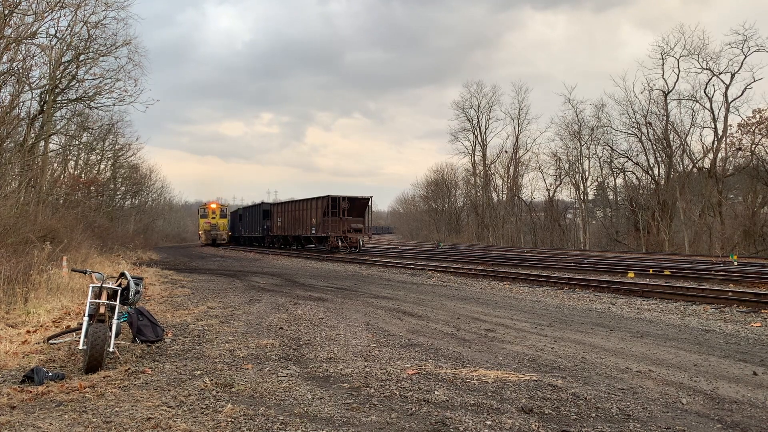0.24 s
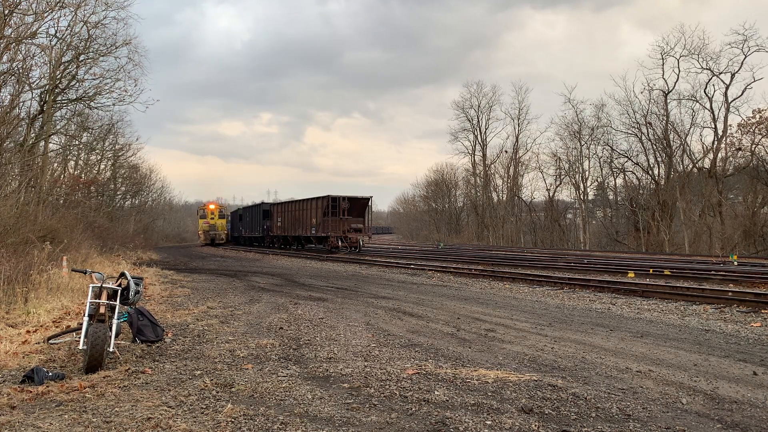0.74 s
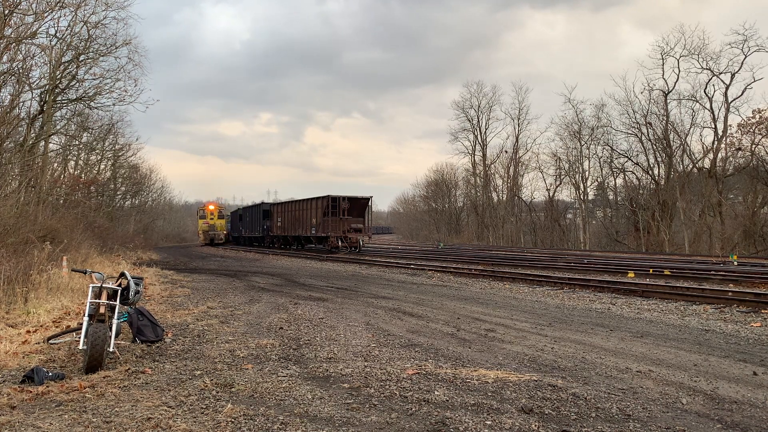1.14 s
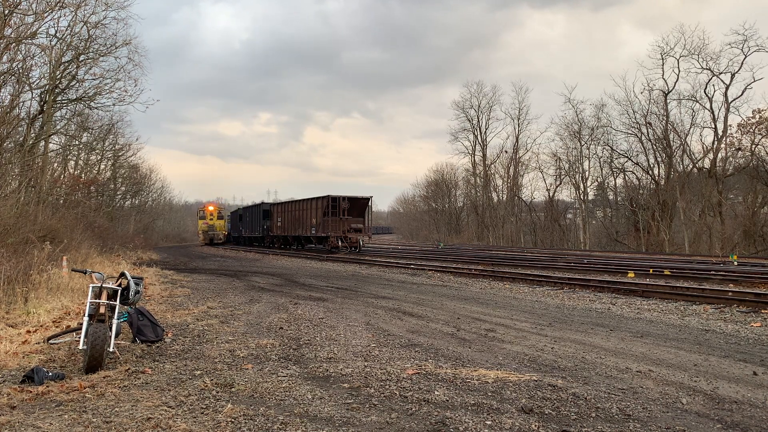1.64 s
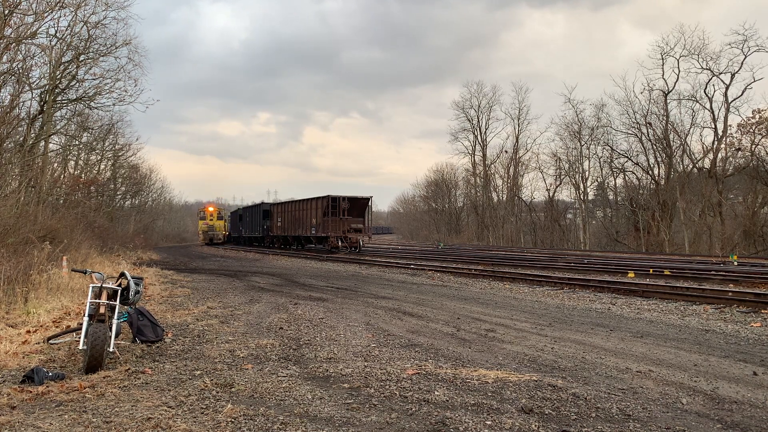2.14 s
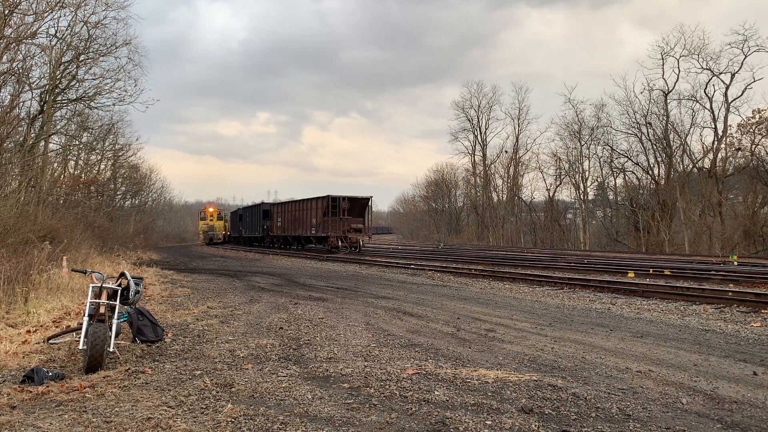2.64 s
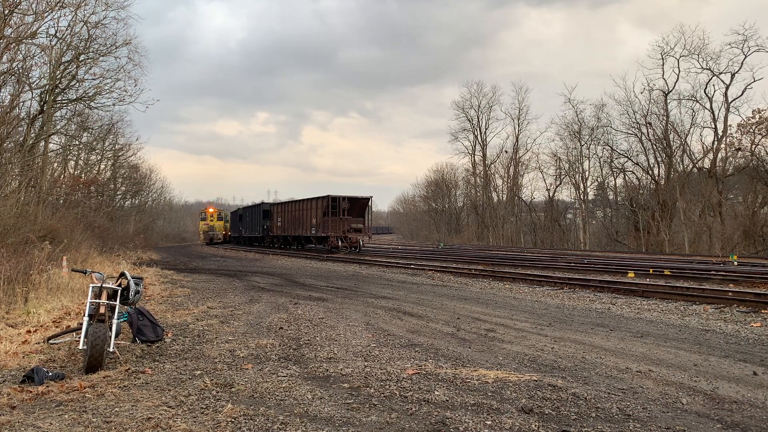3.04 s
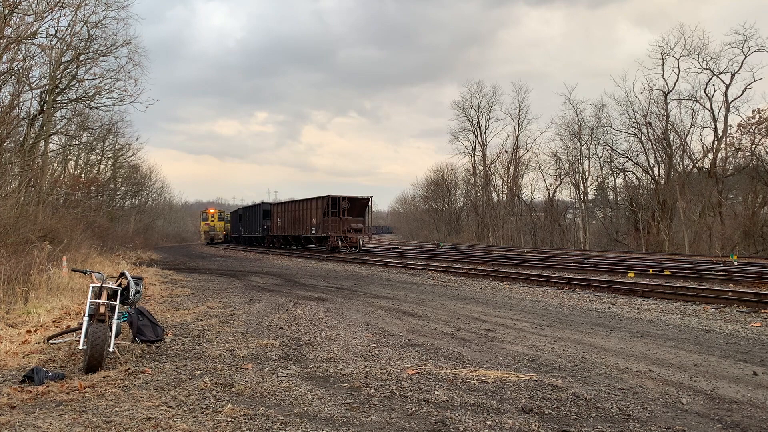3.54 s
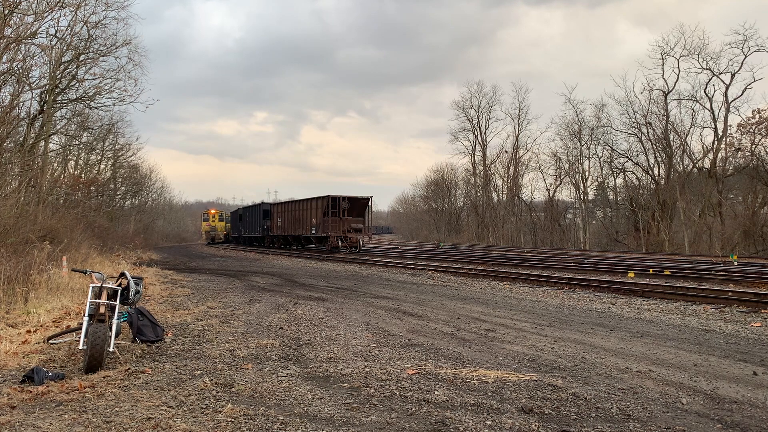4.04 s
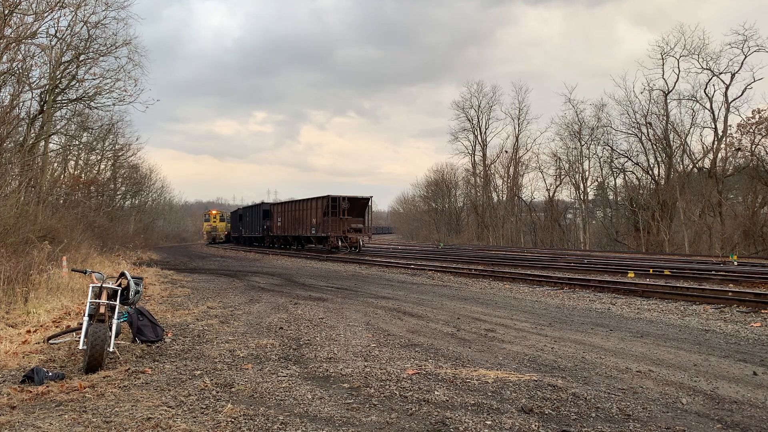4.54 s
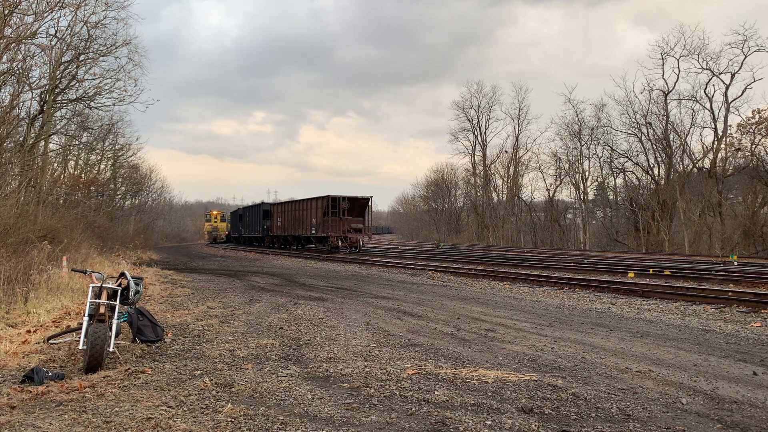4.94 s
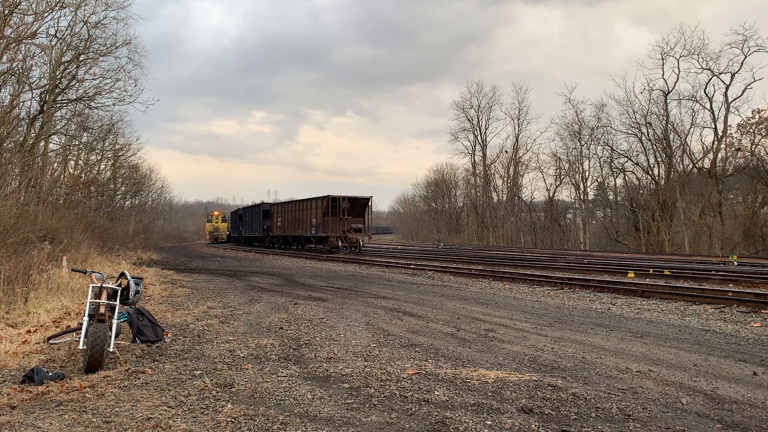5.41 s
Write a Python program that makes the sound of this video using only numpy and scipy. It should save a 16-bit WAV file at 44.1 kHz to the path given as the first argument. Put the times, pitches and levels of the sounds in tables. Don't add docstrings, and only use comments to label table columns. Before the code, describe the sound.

A handheld stereo phone over gravel picks up a low diesel rumble from a train moving away, mostly from the left. A short steel jolt comes early, then irregular dull thumps and hollow car-body drones continue over soft wheel hiss. Sparse dry crackles sound close by, with a sharper grit crunch around the middle. Broad yard hum surrounds everything and the engine slowly weakens.

```python
import sys
import numpy as np
from scipy import signal
from scipy.fft import rfft, irfft
from scipy.io import wavfile
from scipy.ndimage import uniform_filter1d

SR = 44100
rng = np.random.default_rng(int(sys.argv[2]) if len(sys.argv) > 2 else 0)


def ratio_of_db(decibels):
    return 10 ** (np.asarray(decibels, float) / 20)


def transcribe(u):
    v = np.clip(np.atleast_2d(u).T, -1, 1)
    q = np.round(v * 32767).astype(np.int16)
    wavfile.write(sys.argv[1], SR, q)


N = 250047

# pitch_hz, density_db (per Hz)
YARD_COLOUR = [(25, -11), (54, 7), (118, -12), (187, -14.5), (250, -7), (440, -6.5), (650, -8),
               (950, -10.5), (2000, -18), (3050, -26), (4500, -29.5), (6800, -36.5), (8200, -47),
               (15500, -77)]
# pitch_hz, density_db (per Hz)
ROAR_COLOUR = [(300, -24), (430, -4.5), (540, -9.5), (800, -12), (1100, -9.5), (1700, -16), (3050, -22.5),
               (4500, -31), (6000, -37), (7200, -39), (8700, -39), (11000, -44), (13500, -41.5),
               (14900, -43), (15600, -54)]
# pitch_hz, width_hz, added_share (negative thins the
FAN_TONES = [(894, 33, .45), (999, 16, 0.82), (1031, 20, 0.21), (1520, 120, -0.23), (3550, 450, -.35),
             (4750, 760, 0.37), (2950, 450, .15), (1309, 53, 0.7), (1380, 36, 0.22), (1710, 71, 0.67),
             (2270, 390, 0.37), (6700, 38, 0.66)]
# pitch_hz, width_hz, level_db
FRAME_MODES = [(43.7, 6.3, -23), (48.1, 16, 2), (59, 18, 0.5), (78, 28.2, 4.5)]
# pitch_hz, width_hz, level_db
EXHAUST_MODES = [(105.2, 20.3, -2.5), (119.7, 15, -0.5), (142.2, 26.3, 0), (165.5, 20, -5.5),
                 (176.3, 14.1, -1.5), (193.7, 18.7, -5)]
# pitch_hz, width_hz, level_db
BODY_MODES = [(225, 43.4, 2.5), (269.5, 20.4, 0.5), (282.2, 27.3, 0.5), (341.5, 53, -1.5),
              (407.6, 87, -2.5)]
# pitch_hz, resting_db, waver_hz
GEAR_WHINES = [
    (436.8, -52, 1.0),
    (649.5, -57, 1.6),
]
# time_s, rise_db, length_s
TRAIN_SINGS = [(.3, 10, 0.12), (.6, 6, 0.059), (1.199, 4.9, 0.17), (1.6, 13, 0.11), (1.73, 12, .12),
               (2.2, 7, 0.16), (3.6, 9, 0.14), (3.77, 10, 0.08), (4.7, 6, .12), (5.5, 3, .15)]
# time_s, rise_db, length_s
FAR_GEAR_SINGS = [(1.1, 7, .3), (1.42, 5, .15), (2.4, 7, .4), (2.8, 6, .12), (3.12, 13, .12), (3.25, 2, .1),
                  (3.36, 12, .17), (3.8, 6, .28)]
# time_s, level_db
TRAIN_DISTANCE = [(0, -22.5), (.4, -22.5), (.8, -21.5), (2.0, -24), (3.0, -24.5), (4.2, -26), (5.3, -28.5),
                  (5.67, -25.5)]
# time_s, strength_db (negative dips), pitch_hz, length_s
SURGES = [(.01, 14.5, 56, 0.037), (0.158, 6.5, 135, 0.017), (0.276, 6, 58.3, 0.04),
          (0.326, -7, 167, 0.028), (0.43, 5, 135, 0.029), (0.477, 4.5, 57, 0.26), (0.61, 5, 58, 0.042),
          (0.794, -7, 102, 0.093), (0.889, 11.5, 112, 0.026), (0.923, 13, 202, 0.022),
          (1.16, 8.5, 157, 0.062), (1.444, -8.5, 136, 0.05), (1.564, 2, 138, 0.11), (1.65, 4, 134, 0.064),
          (1.735, 5, 59.5, 0.044), (2.099, -11, 137, 0.03), (2.443, 23, 157, 0.031),
          (2.712, 9, 134, 0.029), (2.763, 7, 109, 0.014), (3.048, 4, 58, 0.045), (3.107, -10, 135, 0.028),
          (3.373, 3, 111, 0.18), (3.743, 4, 58, 0.11), (3.867, 6.5, 135, 0.066), (4.214, 0.5, 182, 0.14),
          (4.715, 5.5, 110, 0.13), (4.83, -10, 135, 0.034), (5.09, 7, 177, 0.041),
          (5.256, 16.5, 292, 0.032), (5.317, 7.5, 134, 0.11), (0.324, -2, 49, 0.049),
          (0.947, -15, 49, .05), (1.15, -12, 49, 0.086), (1.317, -8, 49, 0.12), (1.9, 8, 49, .15),
          (2.35, -11, 49, .05), (2.455, 6, 49, .04), (2.53, -10, 49, 0.062), (2.947, 6, 49, 0.076),
          (5.097, -10, 49, .07), (5.404, 9, 49, .07), (1.106, 2.5, 123, 0.045), (2.607, 7.5, 123, 0.041),
          (2.954, -8, 123, 0.029), (3.93, -7, 160, .1), (5.365, 0.5, 123, 0.054), (5.58, -2, 120.3, 0.2),
          (4.9, -3, 200, 0.15), (5.04, -6, 260, 0.061)]
# time_s, rise_db (negative dips), length_s
CAR_ROCKING = [(.32, 7.5, 0.19), (.55, 4.5, 0.11), (1.0, 1, 0.34), (1.6, 4.5, 0.15), (1.9, 3, 0.35),
               (2.5, 7, 0.24), (2.82, 1.5, 0.27), (3.2, 3.5, 0.134), (3.68, 5, 0.14), (4.25, 6, 0.16),
               (4.65, 6, 0.22), (5.2, 4.5, 0.32), (.78, -1.5, .1), (1.35, -1.5, 0.11), (3.45, -1.5, 0.087),
               (4.45, -3, 0.07), (4.95, -0.5, 0.14)]
# time_s, peak_db, pitch_hz, length_s
JOINT_BOOMS = [(0.041, -22, 108, 0.1), (0.255, -30, 48, 0.089), (0.309, -24.5, 323, 0.023),
               (0.315, -32.5, 248, 0.08), (0.319, -18, 110, 0.018), (0.34, -22, 167, 0.035),
               (0.498, -22, 57, 0.041), (0.609, -27, 67, 0.027), (0.882, -18.5, 72, 0.035),
               (0.886, -23, 134, 0.033), (0.937, -24, 100, 0.036), (0.962, -32.5, 273, 0.046),
               (1.122, -22, 106, 0.042), (1.155, -27.5, 182, 0.047), (1.183, -19, 142, 0.042),
               (1.302, -23, 103, 0.03), (1.572, -18.5, 129, 0.052), (1.634, -25, 125, 0.03),
               (2.281, -24.5, 148, 0.094), (2.389, -24.5, 94, 0.082), (2.443, -32, 246, 0.035),
               (2.452, -21, 113.5, 0.056), (2.522, -28, 176, 0.02), (2.652, -22, 96, 0.022),
               (2.763, -18, 103, 0.021), (3.063, -31.5, 253, 0.046), (3.115, -21.5, 109, 0.055),
               (3.278, -26, 90, 0.07), (3.332, -29.5, 147.3, 0.15), (3.385, -22, 78, 0.022),
               (3.599, -33, 175, 0.091), (3.622, -30, 146, 0.088), (3.752, -27, 62, 0.031),
               (3.889, -25, 143.7, 0.11), (4.194, -24.5, 199, 0.043), (4.376, -27.5, 89, 0.12),
               (4.603, -27.5, 146.6, 0.081), (4.641, -36, 230, 0.073), (4.736, -27, 58.6, 0.043),
               (4.749, -24, 112.5, 0.083), (4.932, -26.5, 54, 0.074), (5.062, -27.5, 184, 0.047),
               (5.129, -26.5, 180, 0.028), (5.146, -22.5, 143, 0.023), (5.236, -26, 205, 0.017),
               (5.245, -30.5, 255.6, 0.058), (5.332, -21, 115.5, 0.078), (5.462, -26, 128, 0.05),
               (0.014, -30.5, 264, .045), (0.073, -33, 270, 0.048), (0.115, -36, 257, .04),
               (.322, -38.5, 536, 0.044), (0.338, -35, 407, .045), (0.399, -32, 310, .04),
               (.424, -44, 522, .04), (0.466, -37, 320, 0.051), (0.579, -32, 246, .045),
               (0.98, -43, 370, .045), (1.179, -34, 258, .045), (1.47, -34, 266, .045),
               (1.527, -37, 407, .045), (1.817, -51, 484, 0.036), (2.022, -39, 414, 0.053),
               (2.43, -38.5, 350, .045), (2.485, -36, 398, 0.042), (2.586, -37, 264, 0.039),
               (3.12, -40.5, 330, 0.055), (3.178, -40, 381, 0.053), (3.339, -37, 313, .04),
               (3.646, -38, 367, 0.065), (3.768, -42.5, 350, 0.045), (4.167, -35.5, 345, .07),
               (4.3, -42, 335, 0.06), (4.601, -42, 390, 0.042), (4.743, -37.5, 362, .05),
               (5.141, -42.5, 417, .05), (5.466, -49, 800, .09)]
# time_s, level_db
COUPLER_RATTLE = [(.2, -71), (.252, -44.5), (.275, -45), (.31, -38.5), (.345, -44), (.42, -48), (.55, -52),
                  (.75, -54), (.9, -99)]
# time_s, rise_db, length_s
COUPLER_PUFF = [
    (.255, 20, .016),
    (.315, 19, .07),
    (.42, 6, .14),
]
# time_s, peak_db, centre_hz, body_db (below 5 kHz)
LEAF_TICKS = [(0.2567, -54, 10500, -9), (1.2421, -49, 6600, -22), (1.7784, -51, 14400, 6),
              (2.805, -55.5, 10500, -18), (3.2081, -56, 10000, -6), (3.2484, -53, 7500, -8),
              (3.5069, -58, 11000, -21), (3.708, -53.5, 10800, -9), (4.0264, -52, 6100, -8),
              (4.168, -52, 9600, -9), (4.2652, -49, 5500, -6), (4.9674, -54.5, 12000, -6),
              (5.159, -62, 11000, -4)]
# time_s, peak_db, centre_hz, width_hz, ahead_db (part from straight ahead)
TWIG_SNAPS = [(.4197, -48, 14200, 3000, -8), (.5561, -70, 4200, 1700, 26), (.5559, -50, 6400, 1800, -20),
              (.7379, -43, 7700, 2800, -4), (.9068, -58, 6700, 2200, 12), (.9068, -50, 11500, 6500, -3),
              (2.005, -48, 9200, 3500, -5), (2.248, -46, 5500, 4000, -6), (2.2479, -44, 12500, 6500, -5),
              (2.4166, -46, 7800, 3500, -4), (2.93, -44, 9200, 2800, -16), (3.0603, -52, 7400, 3200, 0),
              (3.0603, -50, 11300, 4000, -5), (3.8358, -47, 9900, 3000, -20),
              (3.8358, -58, 13800, 3000, -6), (4.7911, -42, 13300, 5500, -3),
              (4.8642, -48, 7200, 2600, -20), (5.0143, -52, 6400, 2000, -6), (5.0641, -60, 1300, 1200, 28),
              (5.43, -70, 13000, 3000, 8), (5.4513, -58, 8000, 2500, 0)]
# time_s, peak_db,
# centre_hz, width_hz, left_minus_right_db
PANNED_SNAPS = [(2.93, -42, 1900, 1400, 2), (2.8932, -54, 14500, 2400, -5), (3.0603, -53, 14500, 2400, 0),
                (2.93, -56, 13500, 3500, 0), (3.0603, -53, 3200, 2600, 0), (4.7911, -48, 14800, 2000, -2),
                (2.248, -52, 15000, 1600, -3), (2.8931, -41, 3000, 2600, -12), (2.8931, -47, 4600, 2000, -9),
                (2.8931, -45, 8200, 2400, -6), (2.8932, -52, 11500, 5000, -7), (2.93, -35, 2700, 2400, 4),
                (2.93, -49, 5200, 2400, -1), (2.4166, -52, 5200, 2000, 2), (3.2081, -46, 3700, 1800, 2),
                (5.0641, -47, 2200, 1400, 2), (2.248, -49, 7200, 3000, 0)]
# pitch_hz, left_lead_rad
PORT_LEAD = [(20, 0), (300, .2), (600, .9), (2000, 1.6), (3400, 3.1), (4400, 4.6), (5500, 3.4), (6400, 5.6),
             (8700, 3.1), (10900, .05), (13200, -3.1), (14100, -3.9), (15600, -6.2)]
# pitch_hz, left_minus_right_db
PORT_TILT = [(300, -0.5), (850, 7), (2000, 1), (5000, -4.5), (8500, -1)]


def unit(x):
    return x / np.sqrt(np.mean(x ** 2))


def curve(rows):
    time_s, level_db = np.transpose(rows)
    return np.interp(np.arange(N) / SR, time_s, level_db)


def over_hz(hz, rows):
    pitch_hz, value = np.transpose(rows)
    return np.interp(np.log(hz + 1), np.log(pitch_hz), value)


def swells(rows):
    t = np.arange(N) / SR
    return sum(db * np.exp(-(2 * (t - s) / length_s) ** 2 / 2) for s, db, length_s in rows)


def walk(rate_hz):
    hold = int(SR / rate_hz)
    steps = np.repeat(rng.standard_normal(N // hold + 1), hold)
    return 2.15 * uniform_filter1d(uniform_filter1d(steps, hold), hold)[:N]


def even(x, span_s=0.16):
    power = uniform_filter1d(x ** 2, int(span_s * SR))
    return unit(x / np.sqrt(power + 0.076))


def ring(x, hz, width_hz):
    return signal.lfilter(*signal.iirpeak(min(hz, .45 * SR), hz / width_hz, fs=SR), x)


def rings(x, modes):
    total = 0
    for k, (hz, width_hz, level_db) in enumerate(modes):
        mode = ring(ring(x, hz, 1.51 * width_hz), hz, 1.51 * width_hz)
        total = total + (-1) ** k * ratio_of_db(level_db) * unit(mode)
    return unit(total)


def hiss(colour, swell_db, flicker_db):
    hz = np.fft.rfftfreq(N, 1 / SR)
    spectrum = rfft(rng.standard_normal(N)) * ratio_of_db(over_hz(hz, colour))
    octave = np.log2(hz + 1)
    swell = swell_db * walk(0.63)
    total = 0
    for centre in np.arange(4, 14.5, 1 / 3):
        band = irfft(spectrum * np.clip(1 - 3 * abs(octave - centre), 0, 1), N)
        band_flicker_db = flicker_db + 0.5 * max(centre - 12, 0)
        total = total + band * ratio_of_db(swell + band_flicker_db * walk(14))
    return unit(total)


def burst(s, db, hz, length_s):
    t = np.arange(N) / SR - s
    near = abs(t) < 3 * length_s
    bell = np.exp(-np.log(2) * (2 * t[near] / length_s) ** 2)
    out = np.zeros(N)
    out[near] = ratio_of_db(db) * bell * np.cos(2 * np.pi * hz * t[near])
    return out


def snap(hz, width_hz):
    click = .12 * rng.standard_normal(300) * np.exp(-np.arange(300) / SR / .0008)
    click[0] = 1
    return ring(ring(click, hz, width_hz), hz, width_hz)


def add(out, s, db, click):
    i = int(s * SR)
    out[i:i + len(click)] += click / abs(click).max() * ratio_of_db(db)


def ports(x):
    hz, spectrum = np.fft.rfftfreq(N, 1 / SR), rfft(x)
    half = ratio_of_db(over_hz(hz, PORT_TILT) / 2) * np.exp(.5j * over_hz(hz, PORT_LEAD))
    return np.array([irfft(spectrum * half, N), irfft(spectrum / half, N)])


def whine(hz, db, waver_hz, sings):
    tone = np.sin(2 * np.pi * np.cumsum(hz + waver_hz * walk(20)) / SR)
    return ratio_of_db(db + swells(sings) + waver_hz * walk(14)) * tone


def yard():
    hum = ratio_of_db(-43) * np.array([hiss(YARD_COLOUR, 1.0, 0.74), hiss(YARD_COLOUR, 0.4, 1.0)])
    trees = ratio_of_db(-16) * engine() * np.array([[1], [-1]])
    far = whine(*GEAR_WHINES[1], FAR_GEAR_SINGS)
    return hum + trees + .75 * np.array([far, np.roll(far, 17)])


def leaves():
    shared, front, right = np.zeros((3, N + 400))
    for s, db, hz, body_db in LEAF_TICKS:
        s = s + .001
        add(shared, s, db + 1.0, snap(hz, 720))
        add(front, s, db + body_db, snap(3200, 2600))
        add(right, s, db + 7, snap(hz, 0.61 * hz))
        add(front, s, db - 10.5, snap(8700, 12000))
    for when, size, pitch in rng.random((200, 3)):
        add(shared, when * N / SR, -56 + 7 * size ** 4, snap(8000 + 7500 * pitch, 3500))
    return ports(shared[:N]) + np.array([front, front + right])[:, :N]


def twigs():
    aside, ahead = np.zeros((2, N))
    for s, db, hz, width_hz, ahead_db in TWIG_SNAPS:
        aside += burst(s, db, hz, .88 / width_hz)
        ahead += burst(s, db + ahead_db, hz, .88 / width_hz)
    return ratio_of_db(4) * (ports(aside) + ahead)


def cracks():
    out = np.zeros((2, N))
    for s, db, hz, width_hz, pan_db in PANNED_SNAPS:
        sides = ratio_of_db(np.array([[pan_db], [-pan_db]]) / 2)
        out += sides * burst(s, db, hz, .88 / width_hz)
    return out


def coupler():
    grit = rng.standard_normal(N) * ratio_of_db(4.1 * rng.exponential(size=N))
    # pitch_hz, width_hz, level_db
    dull = [(560, 160, 9.1), (900, 700, 14), (2250, 2000, 15.7)]
    bright = [(3200, 1200, 4), (4700, 1500, -12), (6700, 1400, 3), (9400, 1400, -8), (11000, 2200, -11)]
    rattle = ratio_of_db(curve(COUPLER_RATTLE)) * rings(grit, dull)
    puff = ratio_of_db(-78) * (ratio_of_db(swells(COUPLER_PUFF)) - 1) * rings(grit, bright)
    return rattle + puff


def joints():
    return sum(burst(*row) for row in JOINT_BOOMS)


def part_db(offset_db, hz, fade_share):
    start_db, reach_octaves = -25.5, 0.38
    near = []
    for s, db, surge_hz, length_s in SURGES:
        closeness = np.exp(-(np.log2(surge_hz / hz) / reach_octaves) ** 2)
        near.append((s, db * closeness, length_s))
    fade_db = fade_share * (curve(TRAIN_DISTANCE) - start_db)
    return start_db + offset_db + fade_db + .7 * swells(near)


def wheels():
    roar = hiss(ROAR_COLOUR, 0.2, .9)
    ground_delay_s = 0.002987
    echo = np.roll(ring(roar, 1300, 2900), int(ground_delay_s * SR))
    roar = unit(roar + 0.19 * echo)
    roar = roar + sum(share * ring(roar, hz, width_hz) for hz, width_hz, share in FAN_TONES)
    return ratio_of_db(part_db(-21.5, 900, fade_share=.4) + 0.19 * swells(CAR_ROCKING)) * roar


def firings():
    rate_hz, jitter, scatter_db, gas_db = 56.99, .25, 3.5, 6
    spacing, strength = rng.standard_normal((int(2 * rate_hz * N / SR), 2)).T
    at = np.cumsum(np.exp(jitter * spacing) * SR / rate_hz).astype(int)
    pulses = np.zeros(N)
    pulses[at[at < N]] = ratio_of_db(scatter_db * strength[at < N])
    return unit(pulses - pulses.mean()) + ratio_of_db(gas_db) * rng.standard_normal(N)


def car_bodies():
    level_db = part_db(-15, 234, fade_share=.7) + swells(CAR_ROCKING)
    return ratio_of_db(level_db) * even(rings(firings(), BODY_MODES))


def engine():
    thud = ratio_of_db(part_db(-8.5, 59, fade_share=1.2)) * even(rings(firings(), FRAME_MODES))
    boom = ratio_of_db(part_db(-4.5, 126, fade_share=1.0)) * even(rings(firings(), EXHAUST_MODES))
    return thud + boom


def train():
    gears = whine(*GEAR_WHINES[0], TRAIN_SINGS)
    blower = whine(6934, -89, 3, [(0, 0, 1)])
    return engine() + car_bodies() + wheels() + gears + blower


def scene():
    near = leaves() + twigs() + cracks()
    return yard() + near + ports(train() + joints() + coupler())


def band_limit(x):
    return signal.sosfilt(signal.butter(12, 15800, fs=SR, output="sos"), x)


def record(dry):
    low_cut = signal.butter(3, 34, "high", fs=SR, output="sos")
    top_cut = signal.ellip(10, .3, 60, 15800, fs=SR, output="sos")
    mix = signal.sosfilt(top_cut, signal.sosfilt(low_cut, dry))
    return band_limit(mix)


dry = scene()
out = record(dry)
transcribe(out)
```